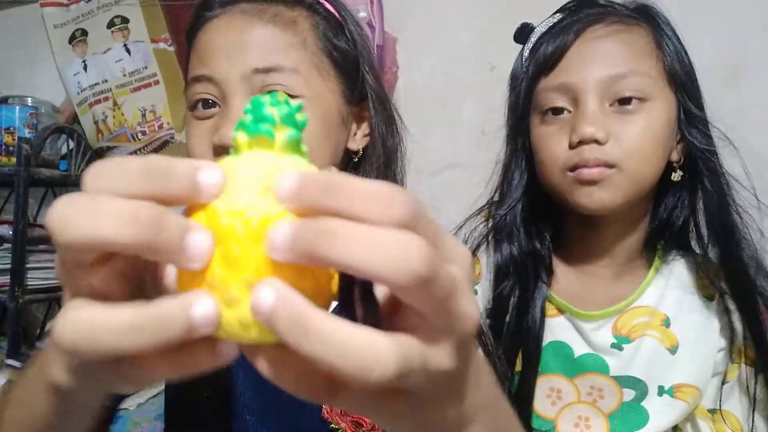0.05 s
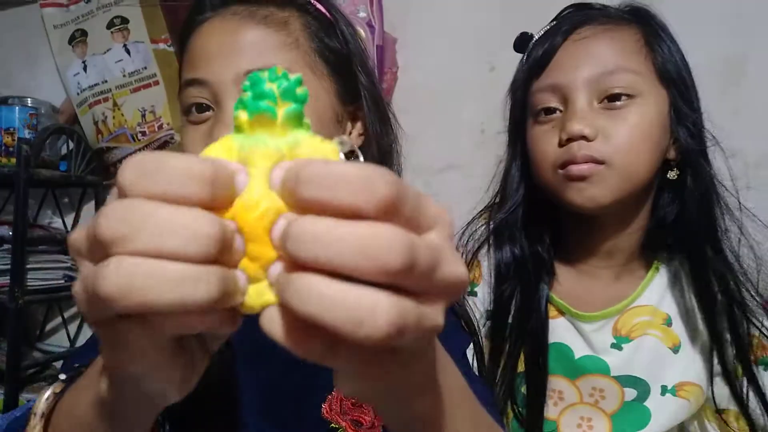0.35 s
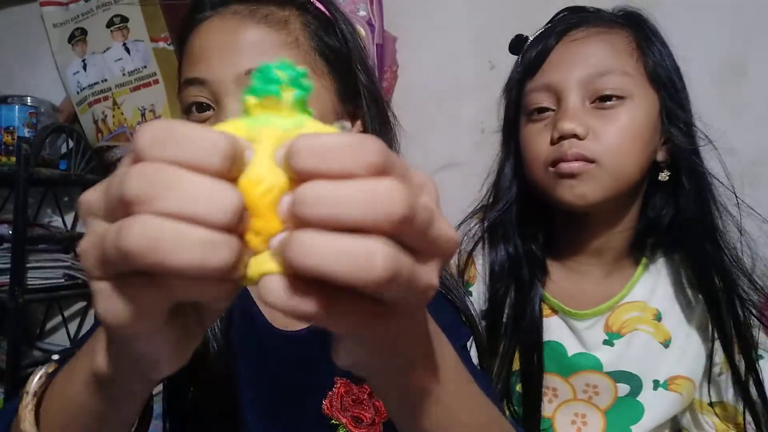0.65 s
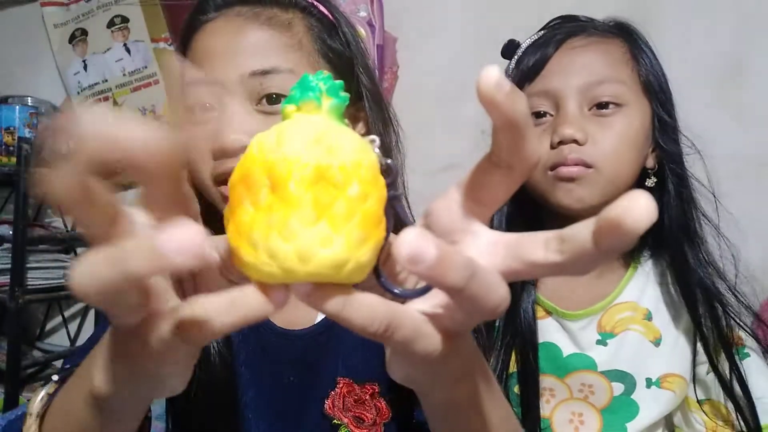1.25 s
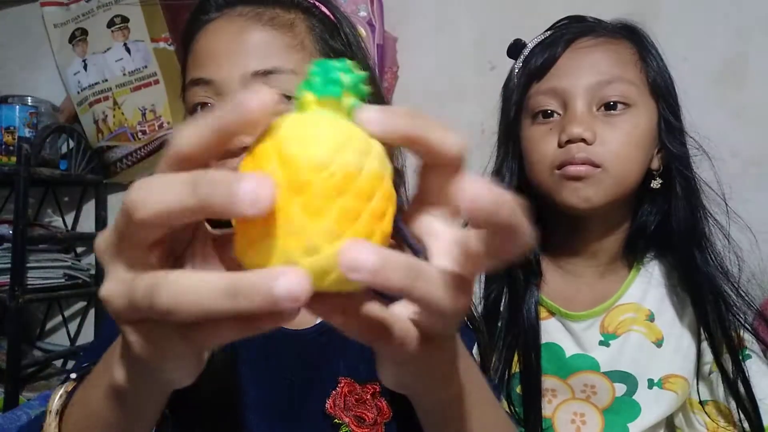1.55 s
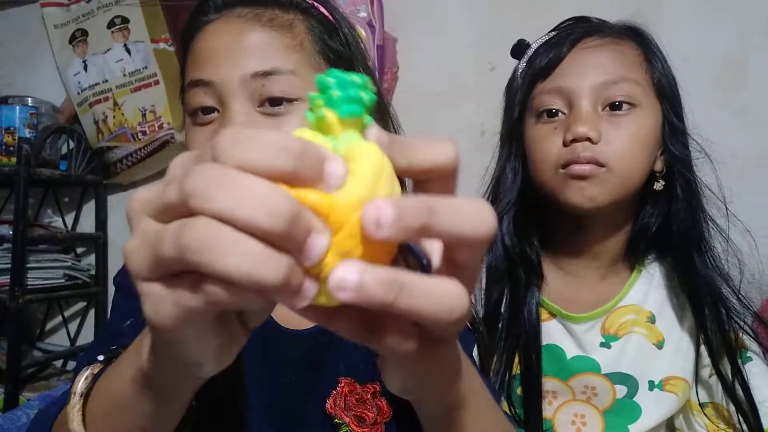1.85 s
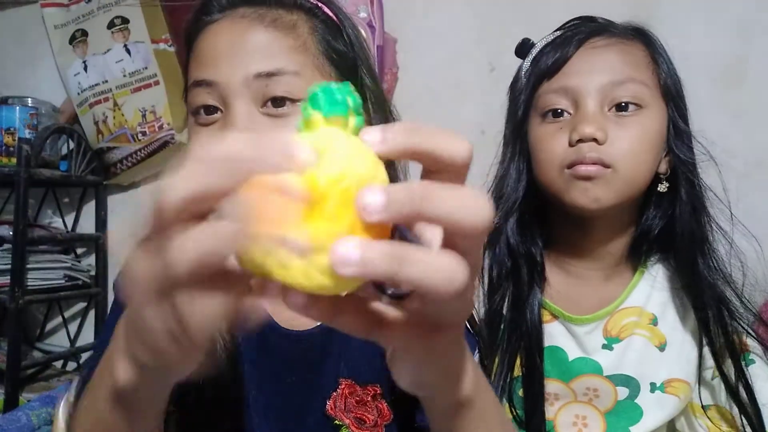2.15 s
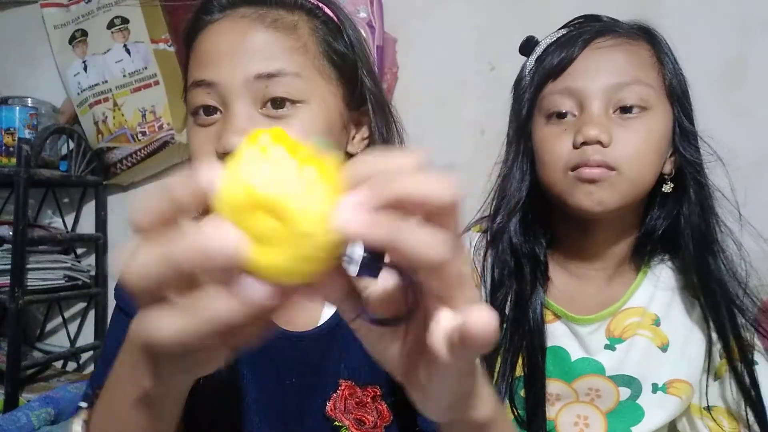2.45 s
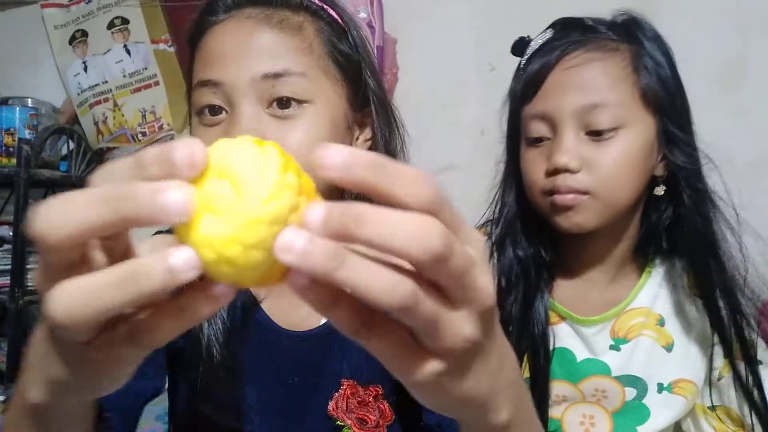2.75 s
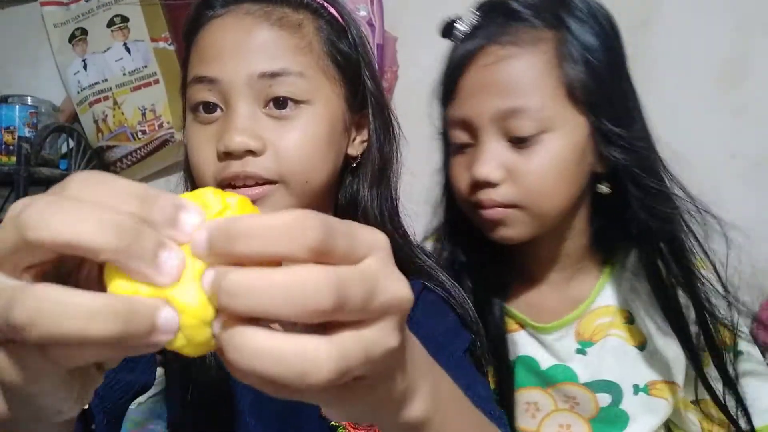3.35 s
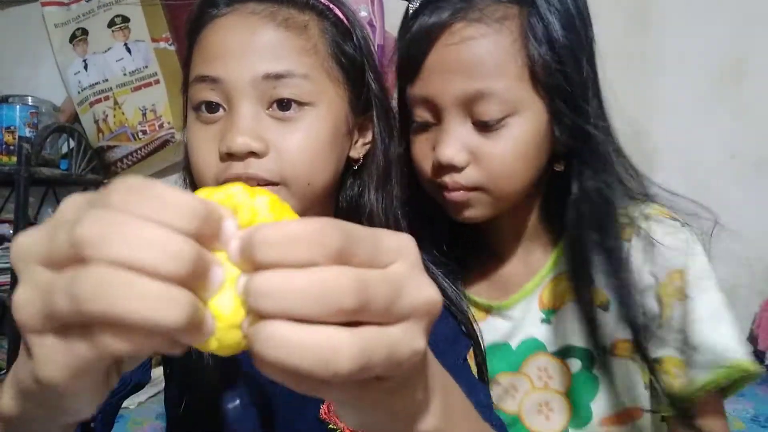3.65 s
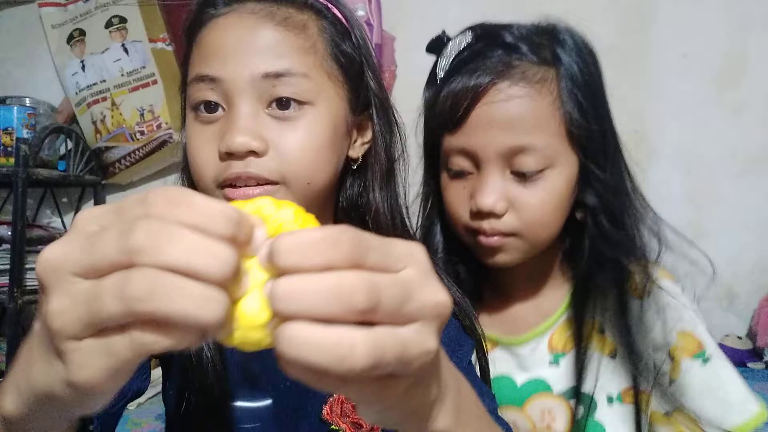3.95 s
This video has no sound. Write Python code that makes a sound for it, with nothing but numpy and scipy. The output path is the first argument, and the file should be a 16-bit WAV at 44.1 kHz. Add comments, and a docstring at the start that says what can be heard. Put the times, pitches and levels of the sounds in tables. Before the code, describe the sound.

A foam toy is squeezed and handled close to the microphone in a room, giving soft, uneven thumps and muffled rubbing. The handling eases briefly, then resumes, with an occasional tiny tick and a low hiss underneath.

```python
"""Squeezing a foam toy

Two hands squeeze and turn a soft foam toy right by a small microphone indoors.
Fingers land with dull thumps and rub in short strokes made of tiny slips, over the low rumble
of the shifting grip. The toy's skin ticks and rustles faintly as it comes unstuck from the fingers.
Steady microphone hiss and a trace of whine lie underneath."""
import sys
import numpy as np
from scipy.fft import rfft, irfft, next_fast_len
from scipy.io import wavfile
from scipy.ndimage import map_coordinates

SR = 44100
rng = np.random.default_rng(int(sys.argv[2]) if len(sys.argv) > 2 else 0)


def wrap_up_sound(samples):
    """Save the sound to the file named by the first command line argument, as 16-bit audio."""
    columns = np.atleast_2d(samples).T
    # keep every value between -1 and 1, then stretch to whole-number steps
    tamed = np.clip(columns, -1, 1)
    steps = np.round(tamed * 32767).astype(np.int16)
    wavfile.write(sys.argv[1], SR, steps)


N = 176400  # 4 seconds
SLIPS_PER_S = 600


def amp(db):
    """Turn decibels into a number to multiply by."""
    return 10 ** (np.asarray(db) / 20)


def unit(x):
    """Scale a sound so that its average strength (rms) is 1."""
    return x / np.sqrt(np.mean(x ** 2) + 1e-20)


def filtered(x, response):
    """Turn each frequency in a sound up or down by the gain that response gives it."""
    size = next_fast_len(len(x) + 8192)
    freq_hz = np.fft.rfftfreq(size, 1 / SR)
    return irfft(rfft(x, size) * response(freq_hz), size)[:len(x)]


def coloured(x, points):
    """Shape a sound's tone along a curve through (freq_hz, gain_db) points."""
    hz, db = np.transpose(points)
    return filtered(x, lambda f: amp(np.interp(np.log(f + 1), np.log(hz + 1), db)))


def bell(distance):
    """A bell curve: 1 at distance zero, falling away on both sides."""
    return np.exp(-.5 * distance ** 2)


def wobble(per_s):
    """A smooth curve that passes through per_s random values each second."""
    return map_coordinates(rng.standard_normal(1024), [np.arange(N) * per_s / SR], mode="wrap")


def slips(per_s):
    """Skin slips in tiny jerks: clicks of uneven size at random moments."""
    spread_db = 3
    chance, size, direction = rng.random(N), rng.standard_normal(N), rng.standard_normal(N)
    return (chance < per_s / SR) * amp(spread_db * size) * np.sign(direction)


def stroke(t, grain, start, length):
    """One finger stroke swells, holds and fades; gives its place in time and its piece of grain."""
    edge_s = .007
    near = slice(max(0, int((start - edge_s) * SR)), int((start + length + edge_s) * SR))
    inside_s = np.minimum(t[near] - start, start + length - t[near])
    swell = np.sin(np.pi / 2 * np.clip(.5 + .5 * inside_s / edge_s, 0, 1))
    return near, unit(swell * grain[near]) * np.sqrt(length * SR / len(swell))  # holds near rms 1


def push(t, hz):
    """A smooth shove and its rebound, centred on time zero and strongest around hz."""
    phase_squared = (np.pi * hz * t) ** 2
    return (1 - 2 * phase_squared) * np.exp(-phase_squared)


def background():
    """Steady microphone hiss, with narrow bands of noise heard as faint wavering whines."""
    # The whines: pitch_hz, width_hz, level_db
    whines = [(942, 4.7, -81), (1037, 17, -80), (1790, 4.7, -90), (1968, 6, -79.5)]
    # Tone of the hiss: freq_hz, gain_db
    hiss_tone = [(20, -2), (100, 9), (300, 1.5), (500, 3.5), (750, -3), (1040, 0.5), (1400, -2.5),
                 (2000, -4), (2600, -5), (3200, -9.5), (4000, -11), (5100, -15), (6600, -16.5), (7900, -14),
                 (9300, -21.5), (11200, -28), (13500, -31), (15400, -28)]
    hiss_db = -59.5
    out = np.zeros(N)
    for hz, width, db in whines:
        whine = filtered(rng.standard_normal(N), lambda f: bell((f - hz) / width))
        out += amp(db) * unit(whine)
    hiss = coloured(rng.standard_normal(N), hiss_tone)
    return out + amp(hiss_db) * unit(hiss)


def grip(t):
    """The shifting hands rumble, and go nearly still while they let the toy swell back."""
    # How loud the rumble is over time: time_s, level_db
    loudness = [(.12, -46.5), (.2, -40), (.75, -38), (.845, -51.5), (.96, -37.5), (1.06, -48), (1.4, -43.5),
                (1.52, -52.5), (1.6, -63), (1.72, -44.5), (1.82, -40.5), (2.15, -40), (2.38, -41.5),
                (2.65, -41), (2.82, -48.5), (3.04, -36.5), (3.23, -48), (3.45, -49), (3.75, -39.5),
                (4, -47.5)]
    # Tone of the rumble: freq_hz, gain_db
    rumble_tone = [(20, -20.5), (36, -26.5), (55, -9), (80, 3.5), (130, -3), (200, -10), (300, -19.5),
                   (450, -30.5), (800, -49.5), (3500, -120)]
    wobble_db = 1.5
    level_db = np.interp(t, *np.transpose(loudness)) + wobble_db * wobble(per_s=25)
    rumble = coloured(slips(SLIPS_PER_S), rumble_tone)
    return amp(level_db) * unit(rumble)


def rustles(t):
    """Fingertips peel off the toy's skin with a faint, dry, bright crackle."""
    # Each peel: start_s, length_s, level_db
    peels = [(.86, .075, -74.5), (2.193, .065, -70.5), (2.52, 0.044, -77)]
    # Tone of the crackle: freq_hz, gain_db
    crackle_tone = [(1500, -36), (3000, -2), (4600, 6), (6500, -12), (8200, 3), (11000, -17), (15500, -16)]
    crackle = coloured(slips(SLIPS_PER_S), crackle_tone)
    out = np.zeros(N)
    for start, length, db in peels:
        near, sound = stroke(t, crackle, start, length)
        out[near] += amp(db) * sound
    return out


def ticks(t):
    """The toy's skin comes unstuck with brief, bright snaps."""
    # Each snap: start_s, peak_db, centre_hz
    snaps = [(0.8643, -54.5, 7500), (2.2057, -49.5, 5400), (2.533, -57, 5800), (2.792, -64, 8300)]
    rise_s, decay_s, width_octaves = .0009, .0016, .48
    age = t[:1024]
    shape = (1 - np.exp(-age / rise_s)) * np.exp(-age / decay_s)
    out = np.zeros(N)
    for start, db, hz in snaps:
        noise = rng.standard_normal(len(age))
        snap = shape * filtered(noise, lambda f: bell(np.log2((f + 1) / hz) / width_octaves))
        out[round(start * SR):][:len(age)] += amp(db) * snap / np.abs(snap).max()
    return out


def rubs(t):
    """A rubbing finger's slips come muffled through the foam, brighter when it drags harder."""
    # Each stroke, with its levels before trim_db is added: start_s, length_s, bass_db, middle_db, top_db
    strokes = [(0.198, 0.031, -50.5, -42.5, -64), (0.281, 0.046, -48, -36, -51),
               (0.4, 0.057, -40.5, -47, -71), (0.435, 0.11, -38.5, -37.5, -45),
               (0.616, 0.025, -39.5, -35.5, -43.5), (0.654, 0.11, -39.5, -37.5, -50),
               (0.783, 0.038, -41, -39.5, -62), (0.855, 0.027, -38.5, -39, -63),
               (0.892, 0.051, -50, -32, -39), (1.074, 0.066, -48, -43, -60.5),
               (1.176, 0.017, -45, -38, -44.5), (1.211, 0.026, -41, -40, -63),
               (1.341, 0.026, -40.5, -42.5, -59), (1.581, 0.047, -39.5, -34, -56),
               (1.627, 0.047, -44, -43, -51.5), (1.949, 0.035, -49, -40.5, -61),
               (2.013, 0.057, -35.5, -34, -51.5), (2.081, 0.1107, -39, -37.5, -55.5),
               (2.241, 0.065, -43, -42, -63), (2.32, 0.026, -51, -35.5, -48),
               (2.413, 0.036, -42.5, -39.5, -54), (2.524, 0.024, -38, -27.5, -40),
               (2.556, 0.02, -38, -28, -39.5), (2.598, 0.073, -42, -42, -57),
               (2.722, 0.086, -42.5, -38.5, -58.5), (2.849, 0.078, -42.5, -39.5, -53),
               (2.942, 0.098, -39, -36.5, -50.5), (3.073, 0.053, -46, -37, -59.5),
               (3.145, 0.052, -46, -41.5, -58), (3.264, 0.058, -47.5, -44.5, -68),
               (3.369, 0.063, -45, -44.5, -55), (3.5, 0.043, -41.5, -39.5, -54.5),
               (3.596, 0.061, -41, -43, -55.5), (3.702, 0.049, -43, -41.5, -58.5)]
    # Tones of a rub's bass, middle and top: freq_hz, gain_db
    bass_tone = [(20, -27), (35, -27), (55, -6), (80, -1.5), (120, 0.5), (170, 0), (260, -26), (500, -56),
                 (1500, -120)]
    middle_tone = [(60, -34), (130, -13.5), (190, 0.5), (260, -4), (350, -9), (480, -26), (900, -63),
                   (2500, -120)]
    top_tone = [(150, -43), (320, -2), (410, 1), (520, -4), (700, -15), (930, -27), (1300, -44),
                (4000, -120)]
    # Level added to every stroke: bass_db, middle_db, top_db
    trim_db = [5, -2.5, 0]
    bass = coloured(slips(SLIPS_PER_S), bass_tone)
    middle = coloured(slips(SLIPS_PER_S), middle_tone)
    top = coloured(slips(per_s=170), top_tone)  # the rarer, harder slips
    out = np.zeros(N)
    for start, length, *levels in strokes:
        for band, db, trim in zip((bass, middle, top), levels, trim_db):
            near, sound = stroke(t, band, start, length)
            out[near] += amp(db + trim) * sound
    return out


def thumps(t):
    """A finger lands: one soft push that does not ring, and a shorter knock as it makes contact."""
    # Each landing: time_s, push_db, pitch_hz, knock_db
    landings = [(0.19, -25, 197, -46), (0.301, -32.5, 103, -41.5), (0.443, -15, 180, -44),
                (0.473, -21.5, 210, -65), (0.489, -28, 115, -51), (0.515, -18, 145, -39),
                (0.594, -24.5, 163, -47), (0.623, -23.5, 211, -28), (0.666, -24.5, 165, -54),
                (0.737, -23.5, 165, -50), (0.857, -25, 147, -62), (0.904, -30, 185, -36),
                (0.913, -17.5, 155, -33), (0.926, -18, 143, -28.5), (0.948, -22.5, 170, -38),
                (1.086, -31.5, 278, -49), (1.181, -28, 175, -45), (1.348, -23, 136, -59),
                (1.366, -23, 181, -57), (1.606, -22, 252, -46), (1.648, -25, 158, -48),
                (1.899, -27.5, 179, -65), (1.958, -26.5, 220, -49), (1.981, -24.5, 154, -51),
                (2.013, -31.5, 298, -64), (2.028, -21, 161, -59), (2.06, -19, 123, -52),
                (2.129, -34, 233, -48), (2.254, -26.5, 98, -60), (2.338, -45, 70, -45),
                (2.424, -27, 136, -54), (2.44, -38, 90, -41), (2.542, -23.5, 317, -24),
                (2.55, -24, 283, -50), (2.658, -27.5, 140, -62), (2.867, -27, 160, -52),
                (2.914, -19.5, 162, -40), (2.938, -26, 246, -46), (2.97, -18, 248, -37),
                (3.004, -16.5, 105, -60), (3.095, -28, 200, -49), (3.168, -25.5, 148, -48),
                (3.274, -29.5, 190, -65), (3.31, -25, 112, -51), (3.387, -26.5, 191, -50),
                (3.473, -20.5, 144, -60), (3.518, -40, 300, -57), (3.622, -27, 164, -63),
                (3.65, -28.5, 245, -45), (3.723, -23.5, 200, -52)]
    knock_hz, reach_samples = 526, SR // 32
    out = np.zeros(N)
    for time_s, push_db, pitch_hz, knock_db in landings:
        centre = int(time_s * SR)
        near = slice(max(0, centre - reach_samples), centre + reach_samples)
        age = t[near] - time_s
        out[near] -= amp(push_db) * push(age, pitch_hz) + amp(knock_db) * push(age, knock_hz)
    return out


def scene():
    """Add the hands and the toy to the background, in one channel."""
    t = np.arange(N) / SR
    mix = thumps(t) + rubs(t) + grip(t) + ticks(t) + rustles(t) + background()
    return mix[None]


def record(dry):
    """The very highest treble is cut off."""
    cutoff_hz = 15550
    return np.array([filtered(channel, lambda f: f < cutoff_hz) for channel in dry])


dry = scene()
out = record(dry)
wrap_up_sound(out)
```